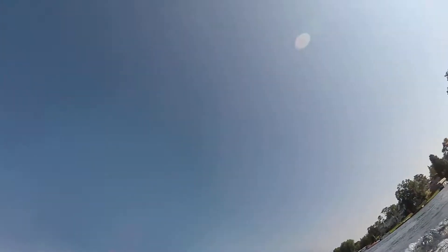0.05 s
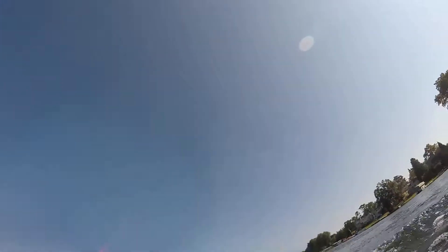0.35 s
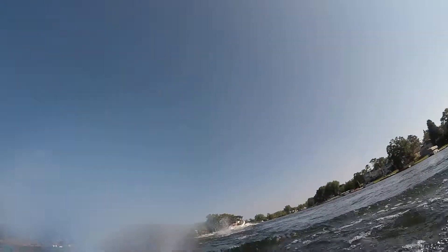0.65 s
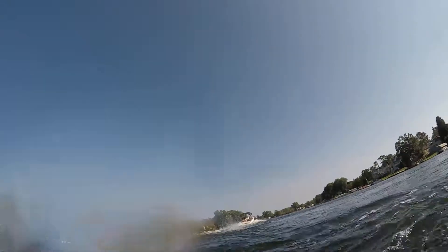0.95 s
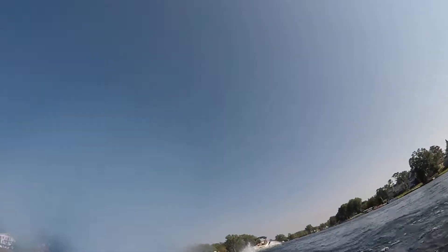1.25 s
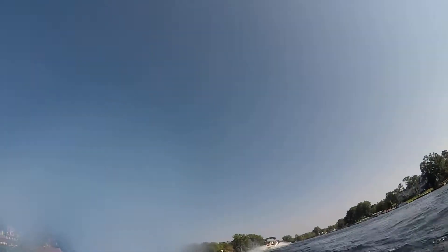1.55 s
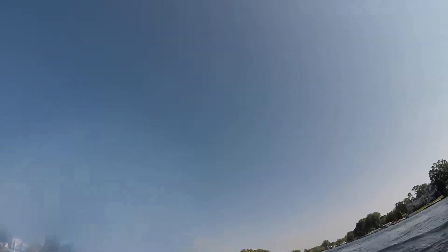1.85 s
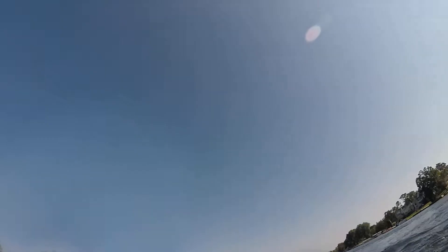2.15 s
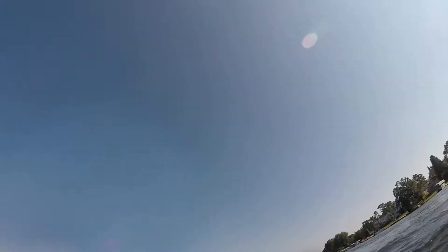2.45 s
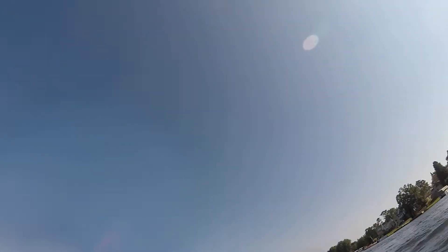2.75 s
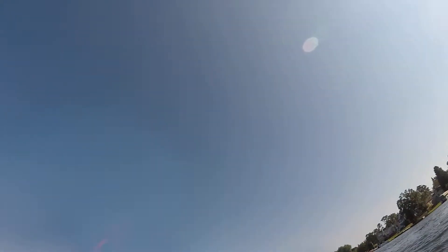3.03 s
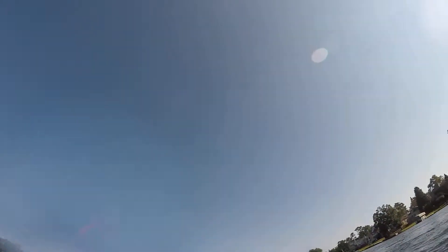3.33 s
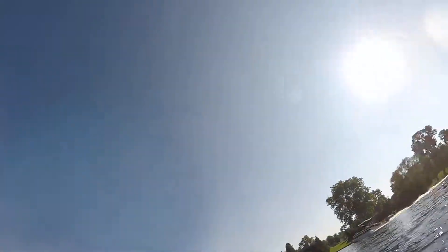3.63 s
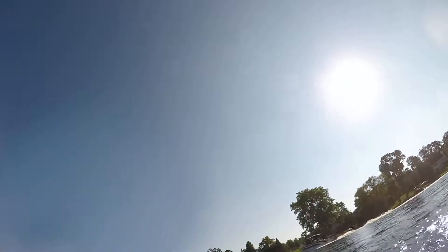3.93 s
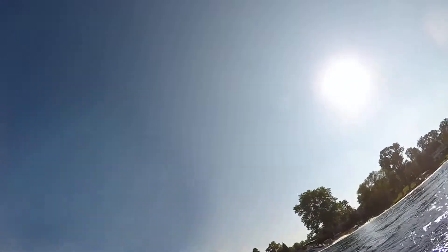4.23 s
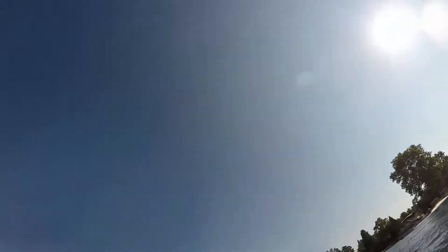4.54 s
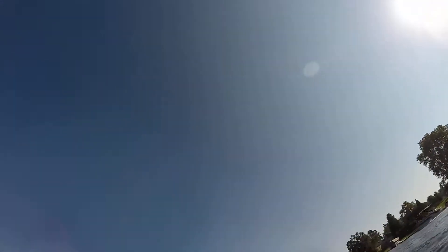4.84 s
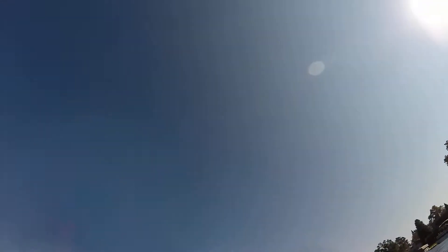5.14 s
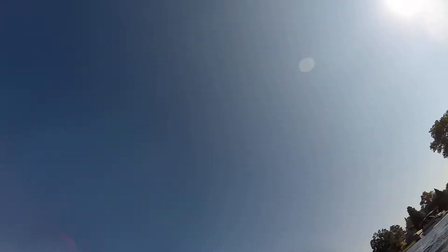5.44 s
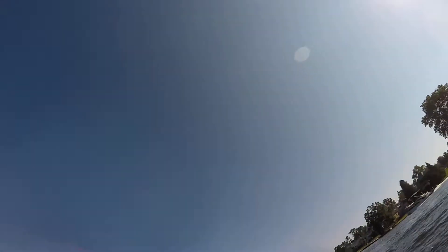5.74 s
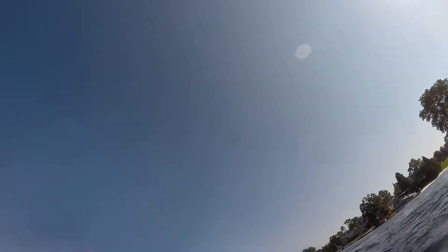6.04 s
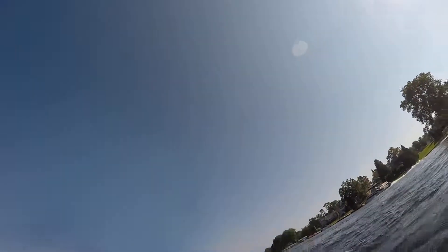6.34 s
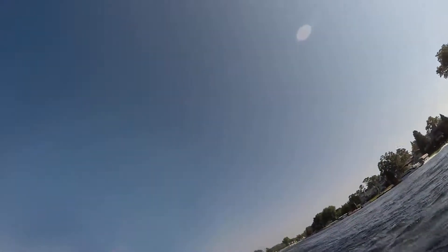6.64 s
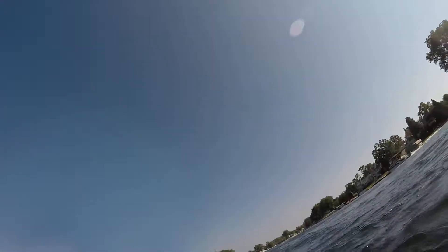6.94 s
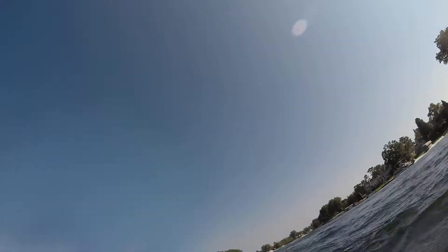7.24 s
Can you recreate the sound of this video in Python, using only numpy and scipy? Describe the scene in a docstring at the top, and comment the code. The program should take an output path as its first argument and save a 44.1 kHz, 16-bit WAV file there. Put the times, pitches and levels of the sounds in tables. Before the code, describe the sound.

A motorboat runs fast on a lake, its exhaust droning over a low rumble of hull and wind and the rush of the wake. Spray sloshes early on and a faint squeak passes. The engine then throttles back and idles with a wavering hum, while water thumps under the hull and single drops plop. Near the end it picks up again. The microphone is close to the water, with no echo.

```python
"""On a lake, close to the water, a V8 motorboat runs fast, throttles back, coasts and picks up again.
Periodic firings make the exhaust drone over the propeller's throb, the hull's rumble and the wake's rush.
Air trapped in water resonates: spray sloshes early on, and single drops plop, mostly once the boat is slow.
A faint squeak passes during the fast run, and the exhaust pipe hums at idle."""
import sys
import numpy as np
from scipy import signal
from scipy.fft import rfft, irfft
from scipy.io import wavfile

SR = 44100
rng = np.random.default_rng(int(sys.argv[2]) if len(sys.argv) > 2 else 0)


def unload_wav(signal):
    """Save mono or channel-first audio to the path in sys.argv[1] as 16-bit WAV at rate SR, clipped to [-1, 1]."""
    wavfile.write(
        sys.argv[1],
        SR,
        np.round(np.clip(np.atleast_2d(signal).T, -1, 1) * 32767).astype(np.int16),
    )


N = 321048
TIME = np.arange(N) / SR

# throttle lever: (time [s], firing rate asked for [Hz])
LEVER = [(0, 274.3), (2.3, 279), (2.49, 262), (2.7, 51), (6.52, 51), (6.73, 125.5)]
# exhaust partials of eight cylinders: (order [multiple of crank speed], relative level [dB])
EXHAUST_LINES = [(1, -11), (1.5, -29.5), (2, -10), (2.5, -21), (3, -14.5), (3.5, -19), (4, -0.5),
                 (4.5, -22.5), (5, -21.5), (5.5, -22.5), (7, -26), (7.5, -28), (8, -19.5), (8.5, -26),
                 (9, -38.5), (12, -32.5)]
# propeller partials: (order [multiple of shaft speed], relative level [dB])
PROPELLER_LINES = [(1, -17.5), (2, -12), (3, -21.5), (4, -20.5)]
# exhaust pipe response, resonant near 120 and 260 Hz: (firing rate [Hz], gain [dB])
PIPE_RESPONSE = [(50, -30.5), (65, -34.5), (100, -26.5), (120, -17.5), (140, -20), (160, -18.5), (195, -20),
                 (222, -24), (245, -16.5), (262, -13.5), (277, -16.5)]
# brightening of the throb during the fast run: (time [s], tilt [dB/octave])
THROB_SLOPE = [(0, -2), (.42, -9.5), (1.1, -2), (1.5, 0), (2.5, 4)]
# waves that the hull rides through: (time [s], length [s], added rumble [dB])
WAVE_CRESTS = [(.39, 0.61, 6.5), (2.027, 0.27, 3.5), (3.76, 0.45, 4.5), (4.342, 1, 6.5), (5.004, 0.43, 4),
               (6.898, 0.7, 3.5)]
# booms of water and exhaust under the hull: (time [s], frequency [Hz], level [dB], length [s])
HULL_BOOMS = [(.4, 205, -17.5, 0.19), (2.028, 97, -17.5, 0.19), (2.36, 140, -20, 0.42),
              (2.601, 190, -13.5, 0.21), (2.952, 268, -22.5, 0.2), (3.728, 90, -13, 0.029),
              (4.113, 100, -15.5, 0.081), (4.476, 100, -15, 0.054), (4.492, 207, -19, 0.096),
              (4.968, 215, -21, 0.076), (5.057, 88, -22.5, 0.17), (6.03, 86, -22.5, 0.12)]
# base levels of water noise: (speed [share of full], rumble [dB], churn [dB], rush [dB], spray [dB])
WATER_LEVELS = [(.37, -35.5, -42, -39, -58.5), (.5, -26.5, -32.5, -37, -57.5), (.8, -28.5, -33, -37.5, -56),
                (1, -25, -29, -37, -50.5)]
# spectra of hull, churned water, foam, spray and hiss: (frequency [Hz], relative level [dB])
RUMBLE_SPECTRUM = [(12, -24), (25, -8.5), (45, -4.5), (90, 0), (140, 1), (220, -7.5), (330, -13.5),
                   (500, -39), (900, -71.5)]
CHURN_SPECTRUM = [(130, -13.5), (260, 3.5), (340, 1), (450, -0.5), (620, -2.5), (800, -9.5), (1000, -32),
                  (1500, -25), (3000, -61.5)]
RUSH_SPECTRUM = [(350, -20), (650, 3), (850, 1), (1050, -1), (1400, 0.5), (1800, -3.5), (2150, -7.5),
                 (2600, -13.5), (2850, -18.5), (3050, -25.5), (3400, -25), (4200, -31.5), (6000, -55.5)]
SPRAY_SPECTRUM = [(1800, -9.5), (2400, 6), (2750, 3.5), (3050, -8), (3300, 5), (3800, -6.5), (4400, -7),
                  (5000, -14), (5800, -10.5), (6700, -10.5), (7500, -16), (10200, -25.5), (12000, -38),
                  (15500, -56.5)]
HISS_SPECTRUM = [(2500, -20.5), (4500, 4), (5500, -4.5), (6200, -1.5), (6700, 1.5), (7200, -1),
                 (8200, -1.5), (9700, 1), (10800, -2.5), (11800, -7.5), (13200, -14), (14200, -33.5),
                 (15500, -55)]
# single drops and bubbles: (time [s], peak level [dB], pitch [Hz], 60 dB decay time [s])
DROP_IMPACTS = [(.112, -34, 2760, .018), (.389, -45, 4770, .018), (.49, -44, 4720, 0.028),
                (.67, -35, 6550, .005), (0.681, -24, 1010, 0.0079), (.7927, -25, 1530, 0.014),
                (0.98, -18, 1750, 0.0083), (1.417, -31, 1290, 0.014), (2.058, -47, 7900, .012),
                (2.092, -45, 7660, 0.024), (3.35, -40, 3130, .025), (4.46, -33.5, 2570, 0.018),
                (4.795, -31, 2200, 0.036), (5.348, -39, 1250, .012), (5.477, -26.5, 2500, .021),
                (5.4987, -21, 1490, .026), (5.571, -41.5, 5460, .008), (5.8965, -29, 1900, 0.047),
                (5.933, -15.5, 1740, 0.026), (5.9417, -21.5, 1683, 0.059), (5.956, -28, 2740, .011),
                (5.972, -19.5, 1900, 0.032), (6.2908, -30, 2420, 0.027), (6.294, -25, 1960, .015),
                (6.579, -28.5, 2150, 0.022), (6.6826, -28, 1850, .024), (6.755, -31, 2400, 0.02),
                (6.8505, -13.5, 1540, 0.013), (6.8525, -27, 2220, .016)]
# sheets of water breaking nearby:
# (peak time [s], rise [s], fall [s], clatter centre [Hz], clatter [dB], glug [dB], mist [dB])
BREAKING_SHEETS = [(.65, 0.047, .02, 1630, -33.5, -41, -55), (.702, 0.019, 0.023, 1640, -30, -25, -45.5),
                   (0.794, 0.007, 0.0087, 1360, -22, -17.5, -56),
                   (.826, 0.0098, 0.0096, 1360, -27, -26, -50.5),
                   (.965, 0.022, 0.023, 2170, -44, -26.5, -49), (1.0, 0.028, 0.048, 1250, -26.5, -24, -59),
                   (2.6, .3, 0.24, 2090, -45.5, -37, -62.5), (3.38, 0.075, 0.06, 1400, -50, -37.5, -71),
                   (4.5, .058, .034, 1430, -61, -31.5, -64), (5.52, 0.061, 0.079, 1700, -44.5, -31, -64),
                   (5.95, 0.2, 0.091, 2170, -51, -37, -63)]
# closing pockets of air: (time [s], level [dB], centre [Hz], half width [share of centre])
AIR_POCKETS = [(0.762, -21.5, 1160, .21), (.896, -26.5, 750, .25), (.928, -32.5, 1990, 0.14),
               (3.3, -35.5, 820, 0.048)]
# swells of the pipe's hum at idle: (time [s], level [dB], length [s])
IDLE_SWELLS = [(3.56, -24.5, 0.19), (4.3, -28.5, 0.77), (4.766, -23.5, 0.22), (5.04, -27.5, 0.16)]


def amp(db):
    """Decibels to amplitude ratio."""
    return 10 ** (np.asarray(db) / 20)


def unit(x):
    """Normalisation to rms 1."""
    return x / np.sqrt(np.mean(x ** 2) + 1e-20)


def curves(table, at=TIME):
    """Linear interpolation of each later column against the first."""
    axis, *columns = np.transpose(table)
    return [np.interp(at, axis, column) for column in columns]


def colour(x, spectrum):
    """Spectral shaping, interpolated over log frequency; rms 1."""
    hz, db = np.transpose(spectrum)
    f = np.fft.rfftfreq(N, 1 / SR)
    gain = amp(np.interp(np.log(f + 1), np.log(hz), db))
    return unit(irfft(rfft(x) * gain, N))


def wander(rate_hz):
    """Low-passed noise: smooth random motion of rms 1."""
    f = np.fft.rfftfreq(N, 1 / SR)
    return unit(irfft(rfft(rng.standard_normal(N)) * np.exp(-(f / rate_hz) ** 2), N))


def bump(s, length):
    """A Gaussian swell of height 1 around time s."""
    return np.exp(-(2 * (TIME - s) / length) ** 2)


def add(mix, s, sound):
    """Superposition of a sound on the mix at time s."""
    part = mix[max(round(s * SR), 0):][:len(sound)]
    part += sound[:len(part)]


def lagged(x, start, lag_s):
    """First-order lag: exponential relaxation from start towards x."""
    step = 1 / (lag_s * SR)
    return start + signal.lfilter([step], [1, step - 1], x - start)


def motion(start_hz=270, full_hz=276, run_down_s=.36, run_up_s=.13, strain_s=.03, coast_s=2.73):
    """Inertia: the engine lags behind the lever, and the boat behind the engine."""
    lever_hz = curves(LEVER)[0]
    pick_up_s = LEVER[-2][0]
    firing_hz = np.where(TIME < pick_up_s, lagged(lever_hz, start_hz, run_down_s),
                         lagged(lever_hz, start_hz, run_up_s))
    slack = 1 - lever_hz / full_hz  # 0 at full throttle
    strain = lagged(np.maximum(lever_hz - firing_hz, 0) / full_hz, 0, strain_s)  # pull of speeding up
    speed = lagged(firing_hz / full_hz, 1, coast_s)
    return firing_hz, slack, strain, speed


def engine(firing_hz, slack, strain, speed, wave_db, gear_ratio=.684, slow_db=-16, strain_db=115,
           rasp_db=-18, slack_rasp_db=12, slack_throb_db=-22, slack_dull_db=-9):
    """Periodic excitation: firings drive the resonant pipe; unequal cylinders and the propeller throb."""
    pipe_db = curves(PIPE_RESPONSE, firing_hz)[0]
    # a wave muffles the drone and loads the propeller
    level_db = pipe_db + slow_db * (1 - speed) + strain_db * strain - .46 * wave_db
    throb_db = slack_throb_db * slack + .54 * wave_db
    tilt_db = curves(THROB_SLOPE)[0]
    turns = np.cumsum(firing_hz * (1 + .0015 * wander(14))) / SR / 4  # four firings a turn
    # each cylinder fires every second turn, so the exhaust lines lie on half multiples
    lines = list(EXHAUST_LINES) + [(gear_ratio * order, db) for order, db in PROPELLER_LINES]
    tones = np.zeros(N)
    for order, db in lines:
        line = amp(db) * np.sin(2 * np.pi * (order * turns + rng.random()))
        if order % 4 == 0:  # the drone: harmonics of the firing rate
            tones += line * (1 + .2 * wander(22)) * amp(slack_dull_db * slack * (order > 4))
        else:
            octaves = min(np.log2(order), .5)  # the tilt levels off above the lowest lines
            tones += line * (1 + .17 * wander(11)) * amp(throb_db + tilt_db * octaves)
    # no two firings are alike: the gas gurgles out through water
    firing_phase = 8 * np.pi * turns
    gurgle = wander(75) * np.sin(firing_phase) + wander(75) * np.cos(firing_phase)
    return amp(level_db) * (np.sqrt(2) * tones + amp(rasp_db + slack_rasp_db * slack) * unit(gurgle))


def hull(speed, wave_db, lumpy_db=.6):
    """Flow noise of wind and water rumbles more at speed and on each wave, with short tonal booms."""
    rumble_db = curves(WATER_LEVELS, speed)[0] + wave_db + lumpy_db * wander(5.5)
    out = amp(rumble_db) * colour(rng.standard_normal(N), RUMBLE_SPECTRUM)
    unsteady_time = np.cumsum(1 + .039 * wander(30)) / SR
    for s, hz, db, length in HULL_BOOMS:
        out += amp(db) * bump(s, length) * np.sin(2 * np.pi * hz * unsteady_time)
    return out


def bubble(hz, t60, onset_cycles=.81, glide=.12):
    """Damped resonance of trapped air, rising in pitch as it nears the surface; peak about 1."""
    t = np.arange(int(t60 * SR) + 8) / SR
    onset = 1 - np.exp(-(t * hz / onset_cycles) ** 2)
    envelope = onset * np.exp(-np.log(1000) * t / t60)
    return envelope / envelope.max() * np.sin(2 * np.pi * hz * t * (1 + glide * t / t60 / 2))


def fizz(lo_hz, hi_hz, per_s, spread_db, cycles, count=32):
    """A Poisson process of bubbles at count pitches, a few louder than the rest; rms 1."""
    out = np.zeros(N)
    for hz in np.geomspace(lo_hz, hi_hz, count):
        chance, size = rng.random(N), rng.exponential(1, N)
        born = chance < per_s / count / SR
        births = born * amp(spread_db * np.minimum(size, 4)) * hz
        out += signal.oaconvolve(births, bubble(hz, cycles / hz))[:N]
    return unit(out)


def wake(speed, wave_db, glug_db=-11, foam_db=-7, droplets_db=-10):
    """Smaller bubbles resonate higher: churn, foam and spray are each noise plus their own bubbles."""
    _, churn_db, rush_db, spray_db = curves(WATER_LEVELS, speed)
    surge = wander(8.9)
    churn = rng.standard_normal(N)
    churn += amp(glug_db) * fizz(243.4, 1003, per_s=600, spread_db=1.3, cycles=12.3, count=16)
    rush = rng.standard_normal(N)
    rush += amp(foam_db) * fizz(804, 3660, per_s=1500, spread_db=1, cycles=12)
    spray = rng.standard_normal(N)
    spray += amp(droplets_db) * fizz(2800, 11000, per_s=600, spread_db=4.7, cycles=33, count=20)
    return (amp(churn_db + .45 * wave_db + .27 * surge) * colour(churn, CHURN_SPECTRUM)
            + amp(rush_db + .18 * surge) * colour(rush, RUSH_SPECTRUM)
            + amp(spray_db + 1.2 * surge) * colour(spray, SPRAY_SPECTRUM))


def hiss(level_db=-64):
    """Stationary noise: the even hiss of the microphone."""
    return amp(level_db) * colour(rng.standard_normal(N), HISS_SPECTRUM)


def drops(snap_db=-28, snap_hz=5200, splatter_db=-14, scatter_s=.0069, spread_octaves=.49, count=5):
    """Air entrainment: each drop lands with a snap, traps a ringing bubble and throws smaller droplets."""
    out = np.zeros(N)
    for s, db, hz, t60 in DROP_IMPACTS:
        add(out, s, amp(db) * bubble(hz, t60))
        add(out, s, amp(db + snap_db) * bubble(snap_hz, t60=.002))
        for delay, pitch, size in rng.random((count, 3)):
            droplet = bubble(hz * 2 ** (spread_octaves * (2 * pitch - 1)), t60 / 2)
            add(out, s + delay * scatter_s, amp(db + splatter_db) * size * droplet)
    return out


def ticks(tick_db=-79, patter_db=-52, patter_at_s=5.8):
    """Random impacts: tiny droplets tick, and patter briefly as the wake overtakes the slow boat."""
    patter = fizz(1830, 2600, per_s=45, spread_db=1.3, cycles=30, count=12)
    droplets = fizz(4300, 7800, per_s=3, spread_db=1.5, cycles=60, count=6)
    return amp(tick_db) * droplets + amp(patter_db) * bump(patter_at_s, length=.5) * patter


def burst(clatter, s, rise, fall, db, hz, width, octaves_per_s=0):
    """Heterodyne filtering: a band of clatter swells and dies; width is its half width as a share of hz."""
    near = (TIME > s - 4 * rise) & (TIME < s + 4 * fall)
    t, out = TIME[near] - s, np.zeros(N)
    swell = np.exp(-(t / np.where(t < 0, rise, fall)) ** 2 / 2)
    centre_hz = hz * 2 ** (octaves_per_s * np.clip(t, -2 * rise, 2 * fall))
    # shift the moving centre down to zero, keep a band around it, shift back
    carrier = np.exp(2j * np.pi * np.cumsum(centre_hz) / SR)
    passband = np.exp(-(np.fft.fftfreq(len(t), 1 / SR) / (2 * width * hz)) ** 2)
    baseband = np.fft.ifft(np.fft.fft(clatter[near] / carrier) * passband)
    band = swell * (carrier * baseband).real
    out[near] = amp(db) * band * np.linalg.norm(swell) / np.linalg.norm(band)
    return out


def splashes(lumpy_db=3, glug_hz=474, mist_hz=3600, fine_hz=7500, fine_db=-12, gulp_s=.011):
    """Sheets of water break into swarms of resonating bubbles; closing air pockets glide upward."""
    clatter = fizz(337, 10000, per_s=7000, spread_db=3.1, cycles=10.2) * amp(lumpy_db * wander(90))
    out = np.zeros(N)
    for s, rise, fall, clatter_hz, clatter_db, glug_db, mist_db in BREAKING_SHEETS:
        out += burst(clatter, s, rise, fall, glug_db, glug_hz, width=.3)
        out += burst(clatter, s, rise, fall, clatter_db, clatter_hz, width=.27)
        out += burst(clatter, s, rise, fall, mist_db, mist_hz, width=.18)
        out += burst(clatter, s, rise, fall, mist_db + fine_db, fine_hz, width=.19)
    for s, db, hz, width in AIR_POCKETS:
        out += burst(clatter, s, gulp_s, gulp_s, db, hz, width, octaves_per_s=19)
    return out


def squeak(s=1.315, length_s=.14, top_hz=1120, level_db=-35.5, octave_db=-12, sag=.028):
    """Frequency modulation: a short, thin tone rises and sinks along a parabola."""
    arch = np.minimum((2 * (TIME - s) / length_s) ** 2, 4)
    phase = 2 * np.pi * np.cumsum(top_hz * (1 - sag * arch)) / SR
    return amp(level_db) * bump(s, length_s) * (np.sin(phase) + amp(octave_db) * np.sin(2 * phase))


def pipe_hum(slack, hz=129.8, slack_db=-39.5, octave_db=-14):
    """Pipe resonance: a wavering low tone and its weak octave swell once the throttle is shut."""
    level = amp(slack_db) * slack + sum(amp(db) * bump(s, length) for s, db, length in IDLE_SWELLS)
    phase = 2 * np.pi * np.cumsum(hz * (1 + .01 * wander(10))) / SR
    tone = np.sin(phase) + amp(octave_db) * np.sin(2 * phase)
    return level * unit(tone * (1 + .17 * wander(26)))


def scene():
    """Free field: over open water the sources add without echoes, in one channel."""
    firing_hz, slack, strain, speed = motion()
    wave_db = sum(db * bump(s, length) for s, length, db in WAVE_CRESTS)
    boat = engine(firing_hz, slack, strain, speed, wave_db) + pipe_hum(slack) + hull(speed, wave_db)
    water = wake(speed, wave_db) + splashes() + drops() + ticks()
    return (boat + water + squeak() + hiss())[None]


def record(dry):
    """Band limiting: a steep low-pass filter removes the highest treble."""
    low_pass = signal.firwin(511, cutoff=15200, window=("kaiser", 9), fs=SR)
    return signal.oaconvolve(dry, low_pass[None], "same")


dry = scene()
out = record(dry)
unload_wav(out)
```